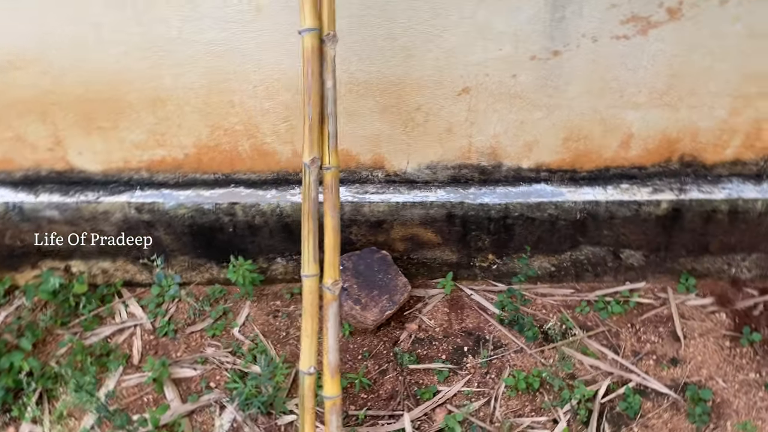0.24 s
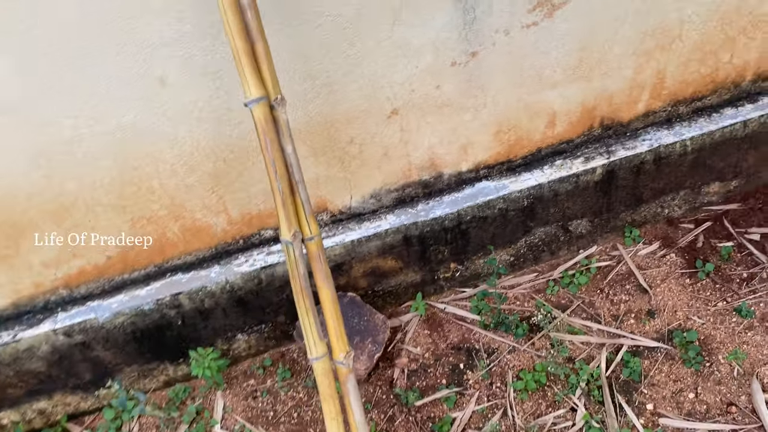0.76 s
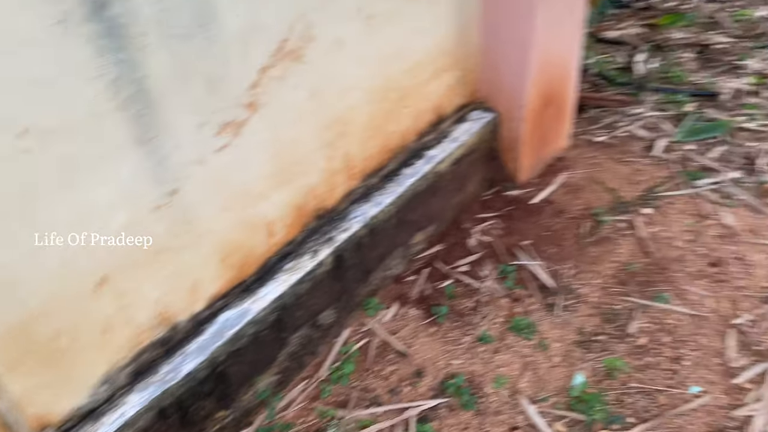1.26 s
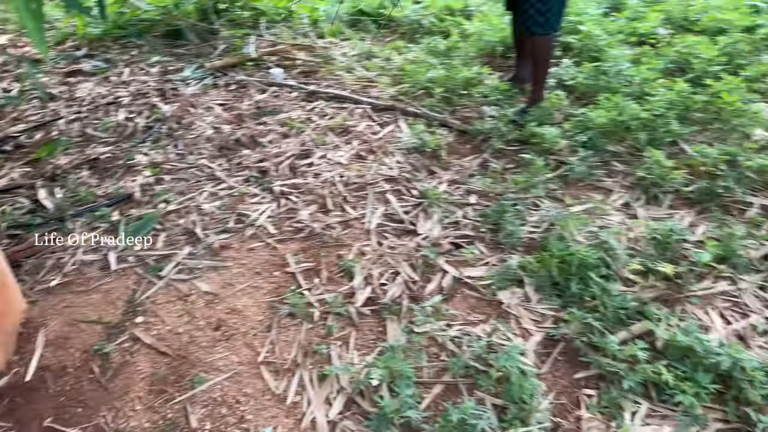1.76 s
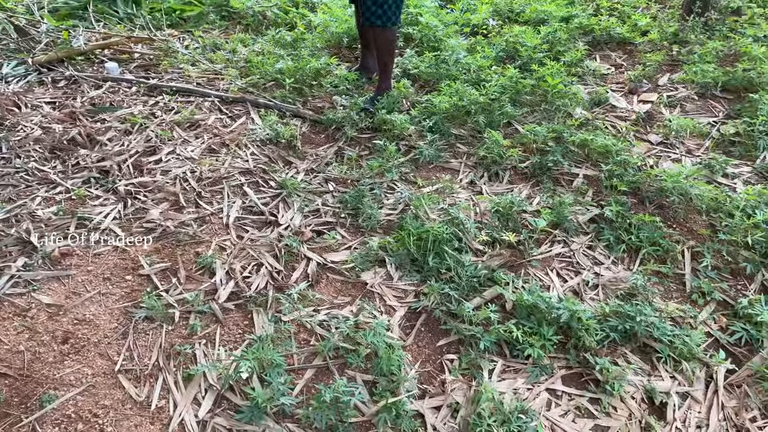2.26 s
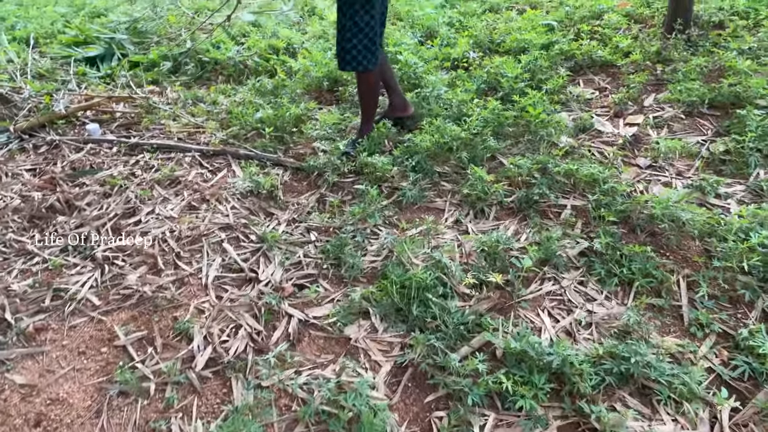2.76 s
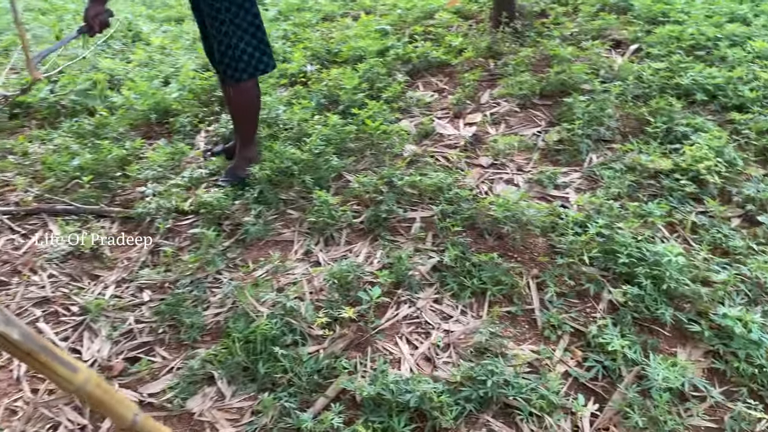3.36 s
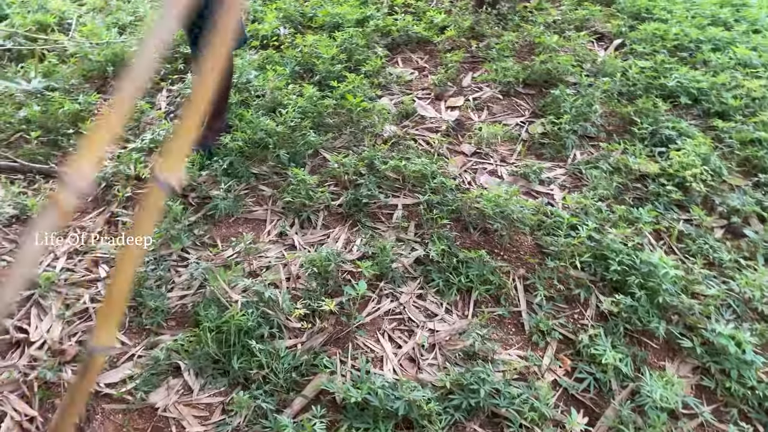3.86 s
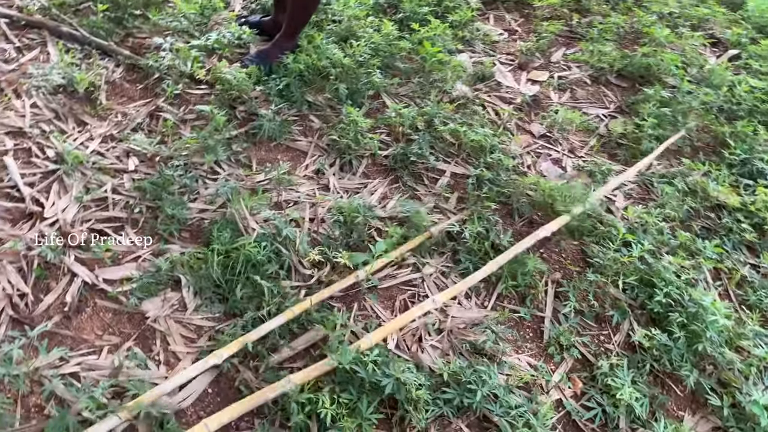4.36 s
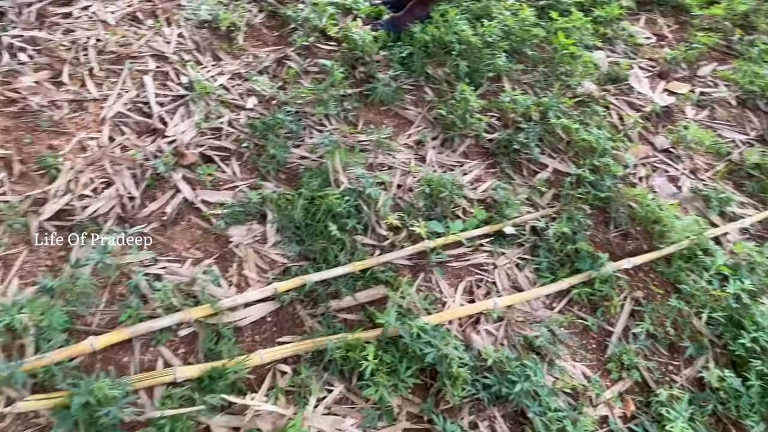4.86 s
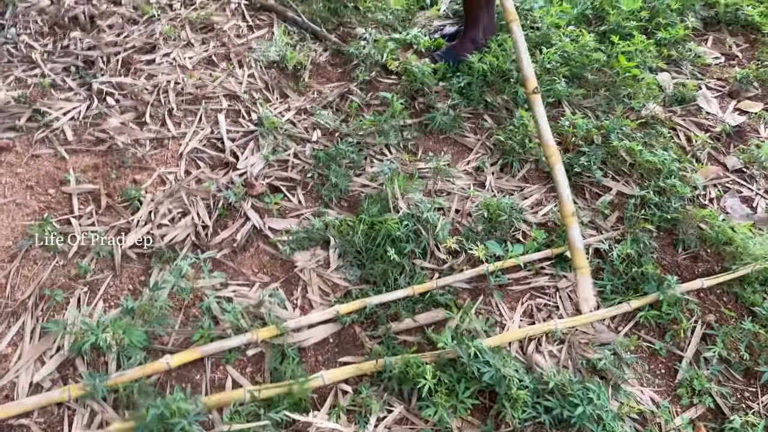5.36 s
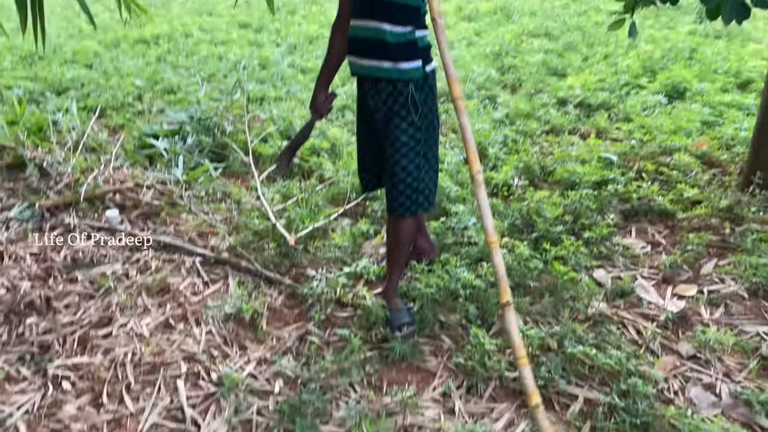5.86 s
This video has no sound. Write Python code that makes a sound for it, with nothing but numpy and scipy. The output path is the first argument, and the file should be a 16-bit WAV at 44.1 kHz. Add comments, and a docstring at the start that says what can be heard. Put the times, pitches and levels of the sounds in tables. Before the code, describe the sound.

A long knife chops bamboo outdoors with sharp, irregular cracks and rustling leaves, then hollow poles clatter onto the ground.

```python
"""Trimming bamboo in a weedy yard

A long knife chops side shoots off bamboo, and after each chop the leaves shiver and settle.
Then trimmed poles are thrown down near the microphone: they clack, ring hollow and thud on the soil.
Dry leaf litter crackles as people move about. Behind it all lie a far engine and thin insect trills."""
import sys
import numpy as np
from scipy import signal
from scipy.fft import rfft, irfft
from scipy.io import wavfile
from scipy.ndimage import uniform_filter1d

SR = 44100
rng = np.random.default_rng(int(sys.argv[2]) if len(sys.argv) > 2 else 0)


def generate_wav(sig):
    """Save sig (samples, or channels by samples) to the path in sys.argv[1] as 16-bit PCM at SR."""
    pcm = np.round(np.clip(np.atleast_2d(sig).T, -1, 1) * 32767).astype(np.int16)
    wavfile.write(sys.argv[1], SR, pcm)


N = 269451
TIME, HZ = np.arange(N) / SR, np.fft.rfftfreq(N, 1 / SR)
BLOW_TIME = np.arange(SR // 3) / SR
LEAD_S = 0.02  # room for the build-up before a crack

# Knife blows: start_s, level_db, snap_db, rise_s, split_s, t60_s, pitch_factor, bass_db,
# treble_db_per_octave, ring_db (snap and ring are relative to the level)
KNIFE_CHOPS = [(0.0, -15.5, 4, 0.00038, 0.0032, 0.14, 1.26, -4, -2.5, -10),
               (1.742, -9, 8, 0.0013, 0.0072, 0.011, 0.97, -1, 3, -12),
               (3.1941, -12.5, 9.5, 0.0012, 0.0038, 0.082, 1.06, 0.5, 1, -28),
               (3.3271, -21, 24, 0.00026, 0.0033, .025, 1.05, -4, -10, -19),
               (3.4, -26.5, 1, 0.00035, 0.0024, .02, 1.64, -2.5, -18, -13),
               (3.9095, -22.5, 3, 0.001, 0.01, 0.031, 1.0, -0.5, 5.5, -10)]
# Poles knocking together near the microphone: same columns as the knife blows
POLE_KNOCKS = [(3.991, -22, 18.3, 0.00023, 0.0014, 0.055, 1.53, -29.5, -5.5, -30),
               (4.018, -23, 16, 0.0016, 0.0014, 0.047, 1.1, 7, -4.5, 4.5),
               (4.074, -30, 6.8, 0.0058, 0.0032, 0.048, 1.5, -5, -9, -16),
               (4.1659, -12.5, 18, 0.0035, 0.003, 0.018, 2.01, -2.5, -3.5, -36),
               (4.269, -11.5, 9.7, 0.0014, 0.0019, 0.022, 1.53, 5, 2, -26),
               (4.2796, -9, 10, 0.00092, 0.0016, 0.025, 0.96, -2.5, 6, -13.5),
               (4.2867, -19.5, 5, 0.0012, 0.0022, 0.073, 0.85, 7, 0, -1),
               (4.3906, -25, 15, 0.00039, 0.00079, 0.013, 1.23, -15, -20, -28),
               (4.504, -32.5, 18, 0.00043, 0.00074, 0.018, 0.63, -6, -18, -28),
               (4.5097, -23, 4.8, 0.00037, 0.0089, 0.011, 0.76, -16, 6.5, -17),
               (5.333, -9.5, 8.7, 0.00054, 0.0033, 0.016, 0.95, -16, -1, -25),
               (5.3384, -12, 17, 0.0025, 0.0061, 0.059, 0.67, 0.5, -5, -3),
               (5.499, -33.5, 5, 0.0009, 0.0073, 0.1, 0.92, -11, 6, -26)]
# Spectrum of splitting bamboo at pitch factor 1: frequency_hz, level_db
CRACK_SPECTRUM = [(35, -43), (100, -13), (400, -9.5), (800, -9.5), (1350, -7.5), (1700, -3), (3000, 0),
                  (4300, -3), (6000, -5), (8000, -10.5), (11000, -12), (13000, -18.5), (16000, -30),
                  (22000, -15)]
# Resonances of the standing stem: pitch_hz, level_db, t60_s
STEM_MODES = [(1000, -8, 0.071), (1730, 11, 0.076), (1770, -10, 0.044), (1940, -20, 0.076),
              (2216, 21, 0.033), (2370, -10, 0.06), (2965, 19.5, 0.041), (3760, -14, 0.054),
              (4170, -4, 0.091), (5670, 11, 0.066)]
# Resonances of a loose pole: pitch_hz, level_db, t60_s
POLE_MODES = [(637, -3.5, 0.091), (703, 5, 0.079), (870, -4.5, 0.051), (1053, -5, 0.094),
              (1690, 5.5, 0.034), (1750, -2, 0.055), (2050, -8, 0.039), (2276, -0.5, 0.08),
              (2530, -5, 0.04), (2610, -4, 0.04), (3480, -2, 0.039), (3900, -18, 0.052), (4350, -16, 0.14)]
# Handling bumps at the start, later poles landing on the ground: start_s, level_db, mid_pitch_hz, t60_s
LOW_THUDS = [(.375, -33.5, 64.4, 0.12), (0.396, -27.5, 107, 0.032), (2.839, -23, 690, 0.01),
             (2.842, -24.5, 327, 0.016), (3.997, -32.5, 119, 0.08), (4.171, -6.5, 159.4, 0.037),
             (4.181, -21, 86, 0.076), (4.277, -6.5, 150, 0.039), (4.286, -22, 79, 0.062),
             (4.356, -23.5, 200, 0.035), (4.473, -33.5, 213, 0.05), (4.63, -43, 178, 0.14),
             (5.351, -16, 149, 0.074), (5.511, -35.5, 138, 0.059)]
# Twigs snapping, and cut shoots dropping with a low scuff: start_s, level_db, t60_s, centre_hz
SNAPS_AND_SCUFFS = [(.8, -35, .04, 5000), (1.403, -36, .04, 9000), (1.422, -32.5, 0.039, 7400),
                    (1.613, -37.5, .032, 3470), (1.86, -35.5, 0.076, 1100), (1.888, -36, 0.055, 910),
                    (2.051, -45, 0.37, 890), (3.24, -8.5, .003, 12000), (3.243, -14, .0036, 12500),
                    (3.243, -38.5, 0.15, 450), (3.321, -23, 0.015, 5550), (4.105, -29, 0.043, 7200),
                    (4.593, -30.5, .027, 4900), (4.705, -36, .046, 3000), (5.0708, -34, 0.0098, 11000),
                    (5.238, -39.5, 0.035, 4700), (5.398, -23.5, 0.018, 9500), (5.598, -34, 0.022, 9000),
                    (5.8013, -34.5, 0.043, 4230), (6.038, -23.5, 0.081, 5600)]
# Spectrum of rustling leaves before the tilt: frequency_hz, density_db
LEAF_SPECTRUM = [(40, -1), (170, -2), (300, -2), (450, -5.5), (900, -1.5), (1800, -1), (3500, -0.5),
                 (6000, -1), (8500, -3.5), (11000, -5), (12700, -9.5), (15500, -9)]
# Foliage shaken by a blow: start_s, level_db, hold_s, t60_s, tilt_db_per_octave
LEAF_SHIVERS = [(0.0, -27, 0.028, 1, 1), (1.747, -33.5, 0.14, 2.3, 1.55), (3.2, -27.5, 0.027, 1.05, 1.5),
                (3.389, -34.5, 0.046, 2, 1.8), (4.278, -33.5, 0.25, 0.8, 0.5), (5.366, -44, .04, 2.2, 1.3)]
# Feet and poles brushing through weeds: middle_s, level_db, half_width_s, tilt_db_per_octave
WEED_SWISHES = [(.725, -39.5, 0.048, 2), (.88, -45.5, .08, 1.5), (1.04, -45, 0.037, 3.5),
                (1.23, -53, 0.07, 5.5), (1.435, -44.5, 0.04, 1), (1.71, -47, 0.12, 2.5),
                (2.35, -43, 0.068, 2), (2.68, -47, 0.24, 1), (3.13, -47.5, 0.075, -.3),
                (4.08, -43, .09, -2), (4.25, -36.5, 0.024, 2), (4.94, -49, .07, 2.5),
                (5.027, -40, 0.019, 3), (5.85, -42, 0.058, 0.7), (5.96, -36.5, 0.045, 0),
                (6.09, -34.5, 0.063, 1.3)]
# Course of the far engine: time_s, firing_rate_hz, level_db
ENGINE_COURSE = [(0, 25.5, -71), (.5, 26.8, -62), (0.698, 27.5, -61.5), (1.3, 28.0, -55),
                 (1.7, 28.2, -58.5), (2.3, 28.5, -58), (2.8, 28.3, -61), (3.1, 28.3, -71), (6.11, 28, -95)]
# Harmonics of the engine: firing_rate_multiple, level_db
ENGINE_ORDERS = [(6, -6), (7, -4.5), (8, -11.5), (9, -14.5)]
# Bands of insect song: pitch_hz, width_hz, level_db
INSECT_TRILLS = [(5360, 710, -65), (6260, 250, -71), (7570, 90, -69)]
# Spectrum of the open air: frequency_hz, density_db
AIR_SPECTRUM = [(25, -18), (40, -15), (62, 6.5), (100, -1), (160, -4), (230, -12), (400, -17), (700, -16.5),
                (1600, -9), (3200, -21), (6000, -24), (10000, -19.5), (12500, -37), (16000, -15)]


def bamboo_blow(row, modes, tail_t60, wall_db, tail_db=-9, snap_hz=2750, snap_t60=0.0033):
    """Contact builds, the wall gives with a snap, fibres split briefly, and the hollow tube rings."""
    level_db, snap_db, rise_s, split_s, t60, pitch, bass_db, treble_tilt, ring_db = row
    t = BLOW_TIME - LEAD_S
    age, since_split = np.maximum(t, 0), np.maximum(t - split_s, 0)
    build = np.exp(np.minimum(t, 0) / rise_s)
    fade = np.hypot(amp(-60 * since_split / t60), amp(tail_db - 60 * since_split / tail_t60))

    def crack_db(f):
        """The crack is lifted at each resonance of the wall."""
        bass = bass_db / (1 + (f / 1100) ** 4)
        treble = treble_tilt * np.log2(1 + (f / 4500) ** 4) / 4
        peaks = sum(1 / (1 + ((f - hz) / 70) ** 2) for hz, _, _ in modes)
        return read_spectrum(CRACK_SPECTRUM, f / pitch) + bass + treble + wall_db * peaks

    crack = colour(build * fade * fibres(len(t)), crack_db)
    # the wall springs back in a few heavily damped cycles
    snap = amp(snap_db - 60 * age * pitch / snap_t60) * np.cos(2 * np.pi * snap_hz * pitch * age)
    ring = np.zeros(len(t))
    for hz, mode_db, mode_t60 in modes:
        cycles = hz * rng.normal(1, 0.0032) * age + rng.random()
        ring += amp(mode_db - 60 * age / mode_t60) * np.sin(2 * np.pi * cycles)
    ring *= (1 - np.exp(-age / 0.0068)) / 2
    return amp(level_db) * (crack + snap * (t >= 0) + amp(ring_db) * ring)


def bamboo(blows, modes, tail_t60, wall_db):
    """A run of blows on a hollow tube: the knife on the stem, or poles falling on each other."""
    out = np.zeros(N)
    for start_s, *row in blows:
        add(out, start_s - LEAD_S, bamboo_blow(row, modes, tail_t60, wall_db))
    return out


def low_thuds(sag=0.17, octave_db=-7):
    """Handling bumps at the start, later poles landing: each a few dull cycles that sink in pitch."""
    out = np.zeros(N)
    for start_s, level_db, hz, t60 in LOW_THUDS:
        glide = 1 + sag * (2 * np.exp(-BLOW_TIME / 0.015) - 1)
        phase = 2 * np.pi * np.cumsum(hz * glide) / SR
        onset = 1 - np.exp(-BLOW_TIME * hz * 4)
        decay = amp(-60 * BLOW_TIME / t60)
        octave = amp(octave_db) * np.sqrt(decay) * np.sin(2 * phase)
        add(out, start_s, amp(level_db) * onset * decay * (np.sin(phase) + octave))
    return out


def twigs_and_shoots(skirt_db=14, rise_share=0.025):
    """Twigs snap, and cut shoots drop with a low scuff: each is a burst in one broad band."""
    out = np.zeros(N)
    t = BLOW_TIME - LEAD_S
    for start_s, level_db, t60, hz in SNAPS_AND_SCUFFS:
        build = np.exp(np.minimum(t, 0) / (rise_share * t60))
        burst = build * amp(level_db - 60 * np.maximum(t, 0) / t60) * fibres(len(t), grain_db=5)
        band = colour(burst, lambda f: -skirt_db * np.log(1 + np.log2((f + 50) / hz) ** 2) / 2)
        add(out, start_s - LEAD_S, band)
    return out


def fibres(count, grain_db=3.0):
    """A dense run of tiny fractures of uneven size, about even in power over a few milliseconds."""
    sizes = np.repeat(rng.standard_normal(count // 8 + 1), 8)[:count]
    fractures = rng.standard_normal(count) * amp(grain_db * sizes)
    return fractures / np.sqrt(uniform_filter1d(fractures ** 2, size=128) + 1e-9)


def leaves(ticks_per_s=450, tick_db=3.0, tick_gain=0.54, patch_db=1.7, flutter_db=0.44):
    """Countless leaves brush each other in a fluttering hiss; those nearer the microphone tick singly."""
    touches = (rng.random(N) < ticks_per_s / SR) * rng.choice([-1, 1], N)
    strength = amp(tick_db * np.minimum(rng.exponential(1, N), 4))
    one_tick = rng.standard_normal(len(BLOW_TIME)) * np.exp(-BLOW_TIME / 0.00063)
    ticks = signal.fftconvolve(touches * strength, one_tick)[:N]
    rustle = rng.standard_normal(N) + tick_gain * unit(ticks)
    f, t, frames = signal.stft(rustle, SR, nperseg=512, noverlap=384)
    level_db, tilt = leaf_motion(t)
    octaves = np.log2(np.maximum(f, 700) / 5000)[:, None]
    shape = amp(read_spectrum(LEAF_SPECTRUM, f)[:, None] + octaves * tilt)
    shape /= np.sqrt(np.mean(shape ** 2, axis=0))
    # the colour flickers in small patches of frequency and time
    patches = uniform_filter1d(rng.standard_normal(frames.shape), size=10, axis=0)
    patches = unit(uniform_filter1d(patches, size=7, axis=1))
    hiss = signal.istft(frames * shape * amp(patch_db * patches), SR, nperseg=512, noverlap=384)[1][:N]
    return unit(hiss) * amp(np.interp(TIME, t, level_db) + flutter_db * noise(HZ < 60))


def leaf_motion(t, rest_db=-58, rest_tilt=1, rise_s=0.012, linger_db=-11, linger_factor=2.7):
    """Level (dB) and tilt of the leaves: shivers and swishes add in power; the strongest leads the tilt."""
    stirs = [(amp(rest_db) * np.ones(len(t)), rest_tilt)]
    for start_s, level_db, hold_s, t60, tilt in LEAF_SHIVERS:
        age = np.maximum(t - start_s, 0)
        fall_db = -60 * np.maximum(age - hold_s, 0) / t60
        # the lightest leaves start weaker and keep moving longer
        settle = np.hypot(amp(fall_db), amp(linger_db + fall_db / linger_factor))
        stirs.append((amp(level_db) * np.minimum(age / rise_s, 1) * settle, tilt))
    for middle_s, level_db, half_width_s, tilt in WEED_SWISHES:
        stirs.append((amp(level_db) * np.exp(-((t - middle_s) / half_width_s) ** 2 / 2), tilt))
    power = sum(gain ** 2 for gain, _ in stirs)
    mean_tilt = sum(gain ** 2 * tilt for gain, tilt in stirs) / power
    return 10 * np.log10(power), mean_tilt


def yard_echoes(direct, wet_db=-24, t60=0.11, echoes_per_s=2000):
    """The direct sound plus weak scattered echoes from the house wall and the trees."""
    taps = rng.standard_normal(len(BLOW_TIME)) * (rng.random(len(BLOW_TIME)) < echoes_per_s / SR)
    taps *= (BLOW_TIME > 0.015) * amp(-60 * BLOW_TIME / t60)
    return direct + amp(wet_db) * signal.fftconvolve(direct, taps / np.linalg.norm(taps))[:N]


def far_engine(waver_db=1.0):
    """An engine in the distance hums on a few harmonics of its firing rate, swelling and dying away."""
    times, rate_hz, level_db = np.transpose(ENGINE_COURSE)
    firings = np.cumsum(np.interp(TIME, times, rate_hz)) / SR
    gain = amp(np.interp(TIME, times, level_db) + waver_db * noise(HZ < 4))
    return gain * sum(amp(db) * np.sqrt(2) * np.sin(2 * np.pi * (order * firings + rng.random()))
                      for order, db in ENGINE_ORDERS)


def insects(swell_db=3):
    """Thin, narrow bands of insect song that swell and fade."""
    out = np.zeros(N)
    for hz, width_hz, level_db in INSECT_TRILLS:
        band = noise(1 / (1 + (2 * (HZ - hz) / width_hz) ** 2))
        out += amp(level_db) * unit(band * amp(swell_db * noise(HZ < 6)))
    return out


def open_air(level_db=-51, low_cut_hz=30):
    """The low rumble and faint hiss of the outdoors."""
    low_cut = HZ ** 4 / (HZ ** 4 + low_cut_hz ** 4)
    return amp(level_db) * noise(amp(read_spectrum(AIR_SPECTRUM, HZ)) * low_cut)


def amp(db):
    """Decibels to gain."""
    return 10 ** (np.asarray(db) / 20)


def unit(x):
    """Scales to rms 1."""
    return x / np.sqrt(np.mean(x ** 2) + 1e-20)


def read_spectrum(points, hz):
    """Level (dB) of a spectrum, interpolated on a log-frequency axis."""
    f, db = np.transpose(points)
    return np.interp(np.log(hz + 1), np.log(f), db)


def add(mix, start_s, sound):
    """Mixes a sound in, trimming what falls outside the mix."""
    at = round(start_s * SR)
    part = mix[max(at, 0):][:len(sound) + min(at, 0)]
    part += sound[max(-at, 0):][:len(part)]


def noise(gain):
    """Steady noise of rms 1 with the given gain per frequency."""
    return unit(irfft(rfft(rng.standard_normal(N)) * gain, N))


def colour(x, db_at, size=1024):
    """Applies a causal filter of unit energy, shaped like db_at(Hz)."""
    log_gain = np.log(amp(db_at(abs(np.fft.fftfreq(size, 1 / SR)))))
    taps = np.fft.ifft(np.exp(np.conj(signal.hilbert(log_gain)))).real
    return signal.fftconvolve(x, taps / np.linalg.norm(taps))[:len(x)]


def scene():
    """One microphone in the yard: the work close by, the engine far off."""
    chops = bamboo(KNIFE_CHOPS, STEM_MODES, tail_t60=0.13, wall_db=3)
    knocks = bamboo(POLE_KNOCKS, POLE_MODES, tail_t60=0.15, wall_db=2.5)
    work = yard_echoes(chops + knocks + twigs_and_shoots() + low_thuds()) + leaves()
    background = open_air() + far_engine() + insects()
    return (work + background)[None]


def record(dry, low_cut_hz=45, ceiling=0.85, top_hz=15900):
    """The microphone drops the deepest bass and rounds off the loudest peaks; the top treble is cut."""
    trimmed = signal.sosfilt(signal.butter(2, low_cut_hz, "highpass", fs=SR, output="sos"), dry)
    rounded = trimmed / (1 + (trimmed / ceiling) ** 6) ** (1 / 6)
    lowpass = signal.firwin(511, top_hz, window=("kaiser", 8), fs=SR)
    return signal.oaconvolve(rounded, lowpass[None], "same")


dry = scene()
out = record(dry)
generate_wav(out)
```